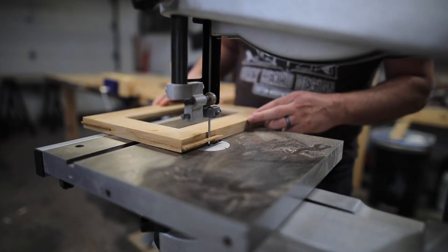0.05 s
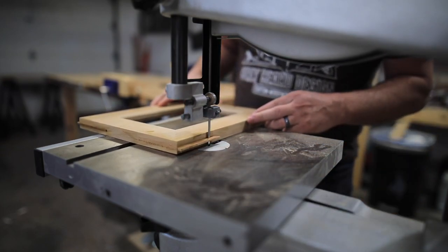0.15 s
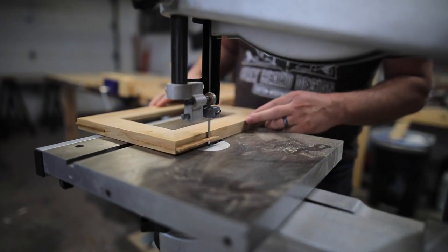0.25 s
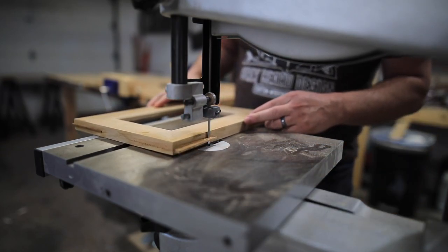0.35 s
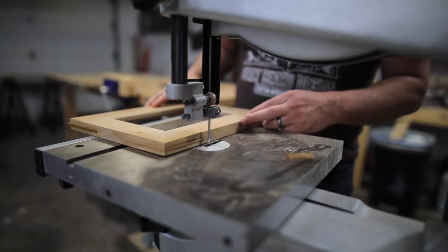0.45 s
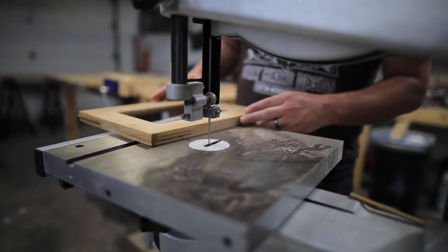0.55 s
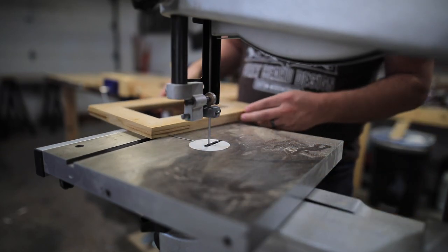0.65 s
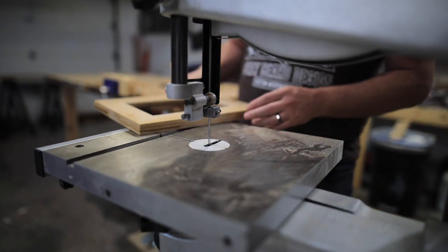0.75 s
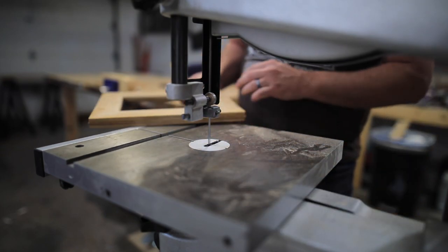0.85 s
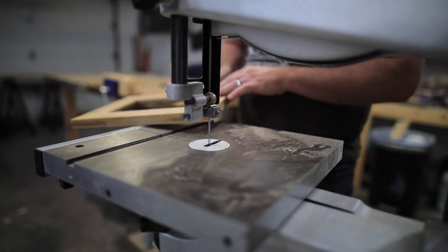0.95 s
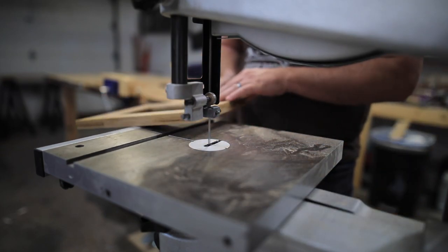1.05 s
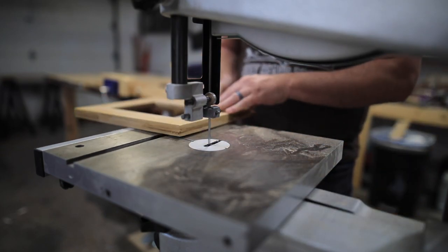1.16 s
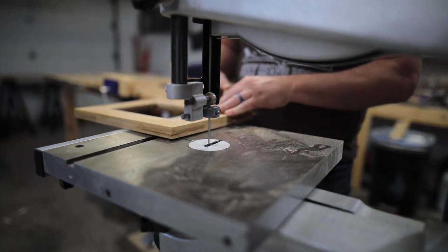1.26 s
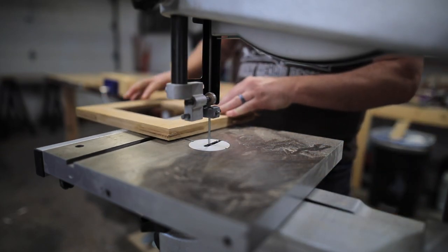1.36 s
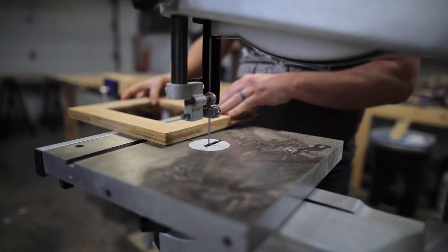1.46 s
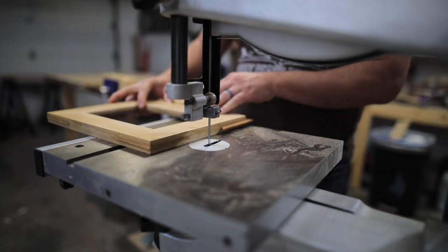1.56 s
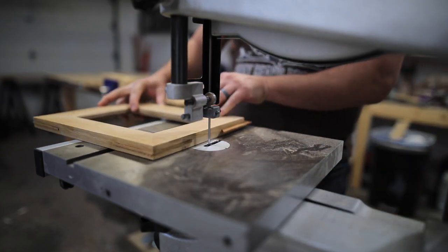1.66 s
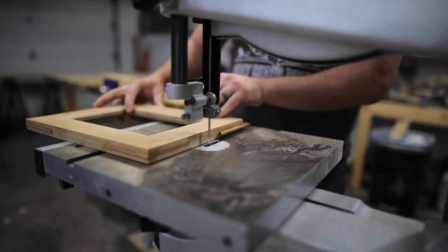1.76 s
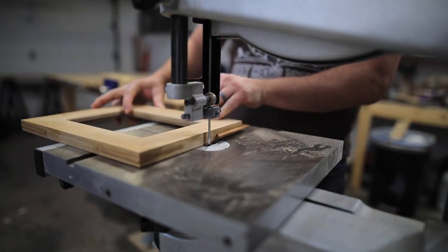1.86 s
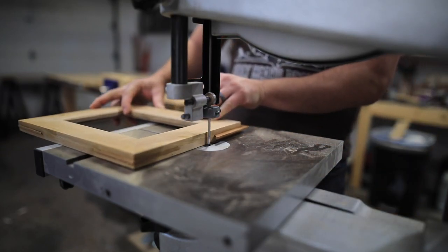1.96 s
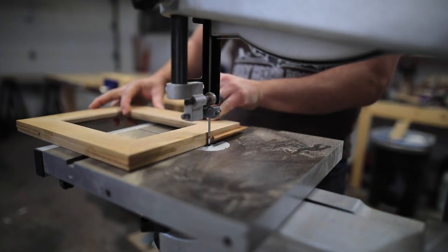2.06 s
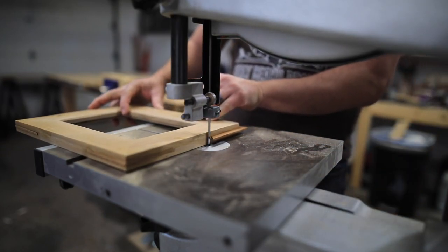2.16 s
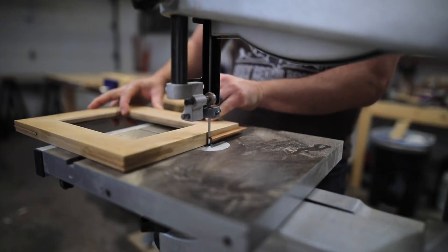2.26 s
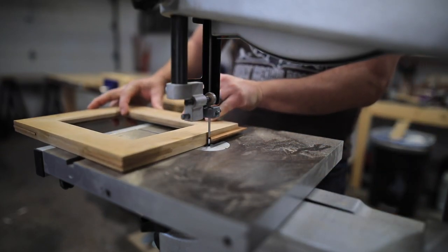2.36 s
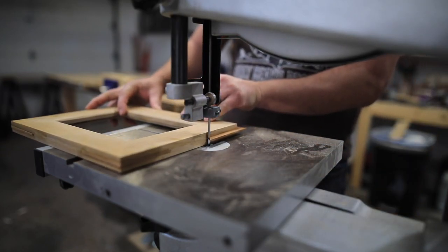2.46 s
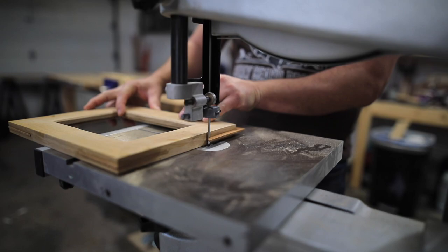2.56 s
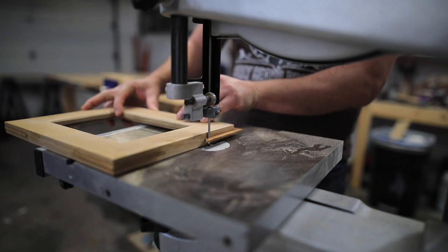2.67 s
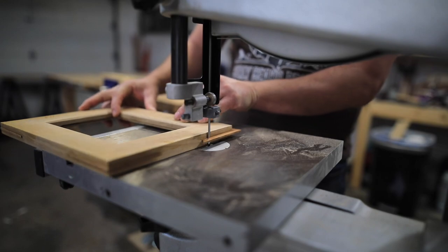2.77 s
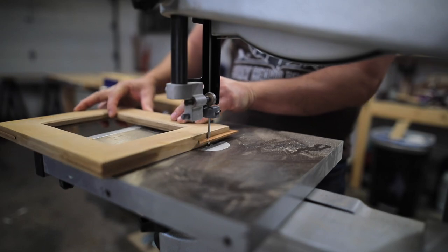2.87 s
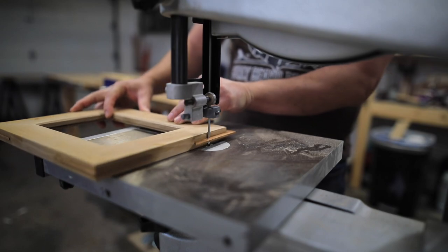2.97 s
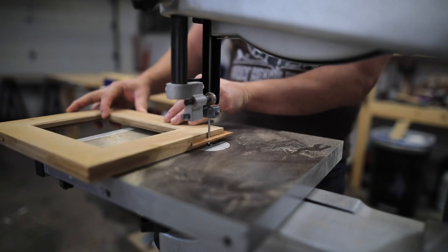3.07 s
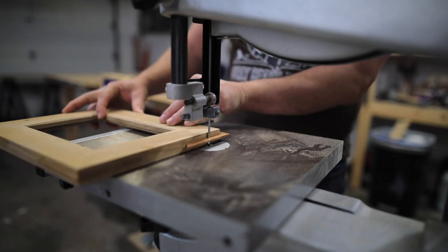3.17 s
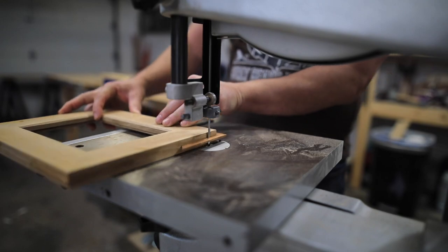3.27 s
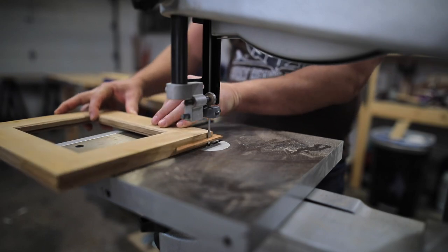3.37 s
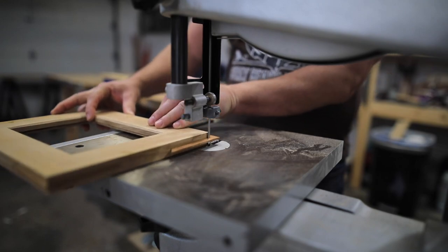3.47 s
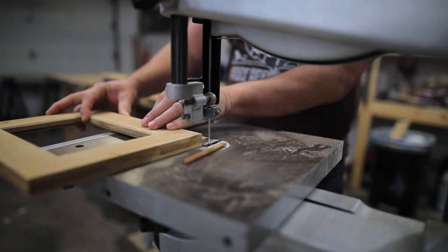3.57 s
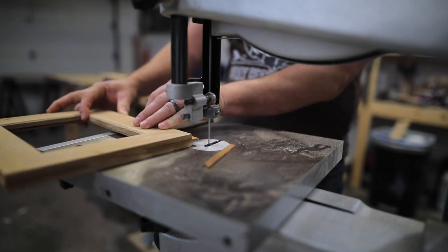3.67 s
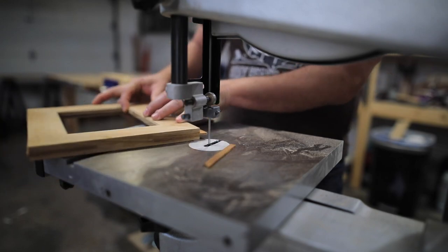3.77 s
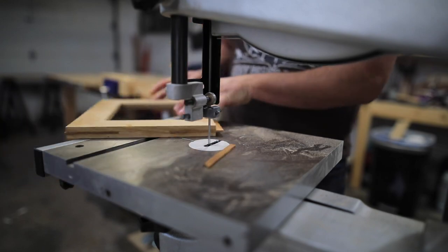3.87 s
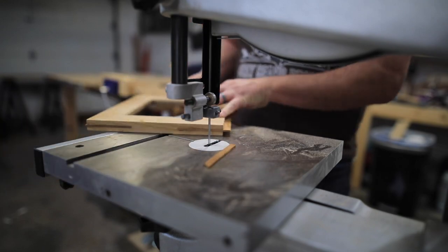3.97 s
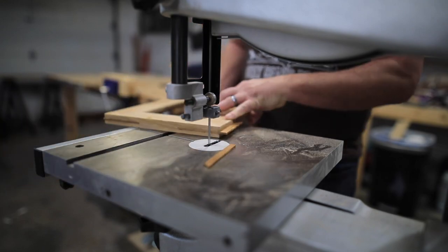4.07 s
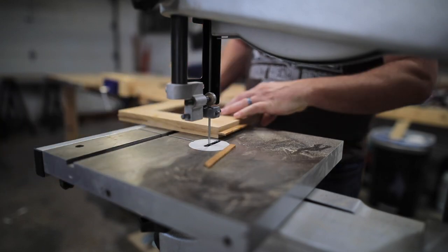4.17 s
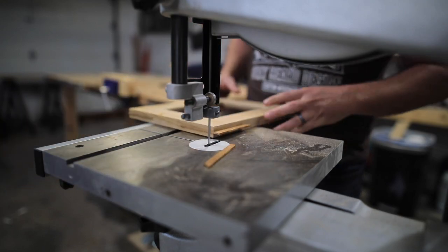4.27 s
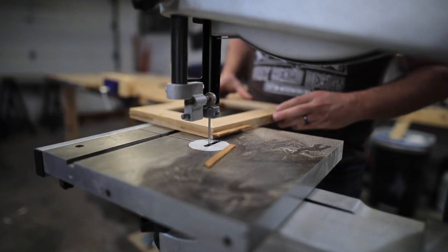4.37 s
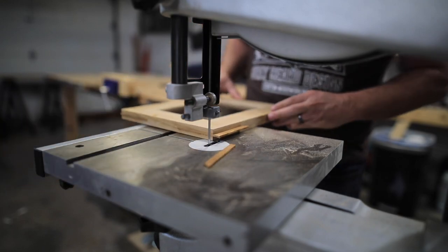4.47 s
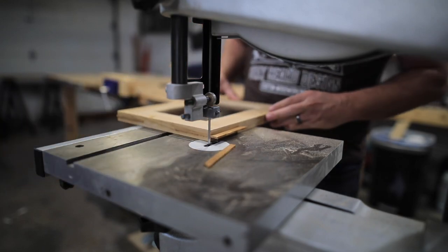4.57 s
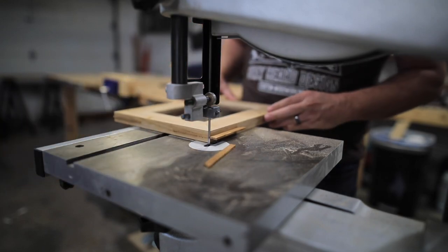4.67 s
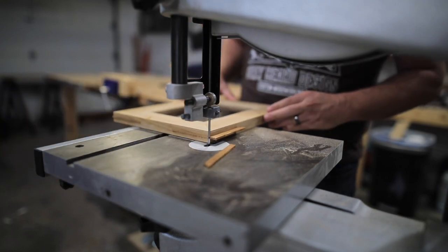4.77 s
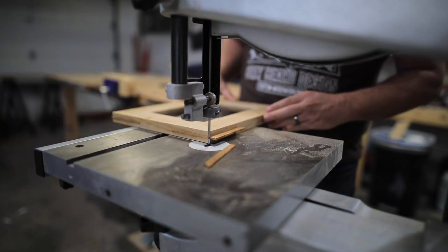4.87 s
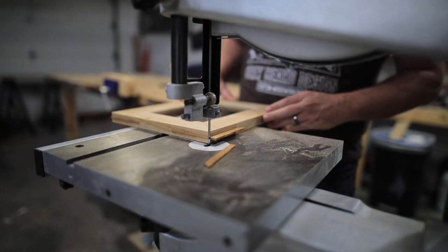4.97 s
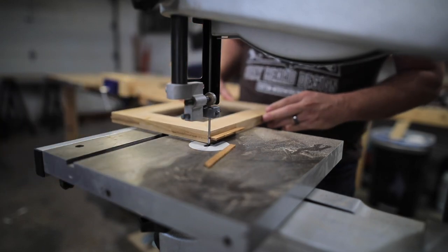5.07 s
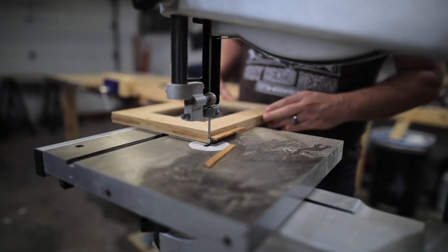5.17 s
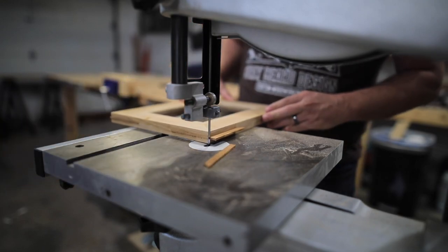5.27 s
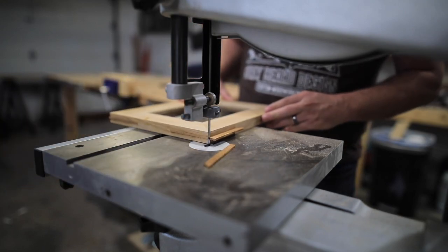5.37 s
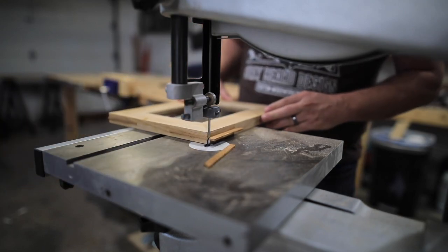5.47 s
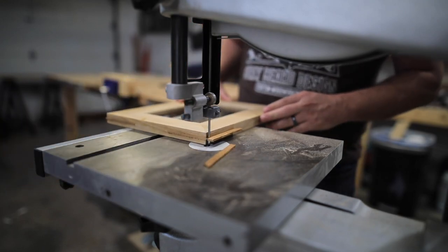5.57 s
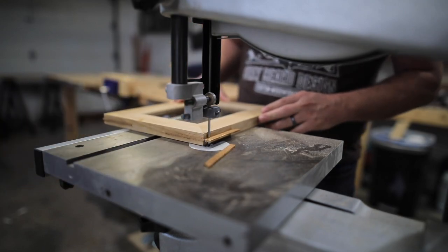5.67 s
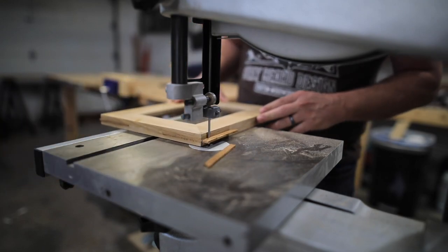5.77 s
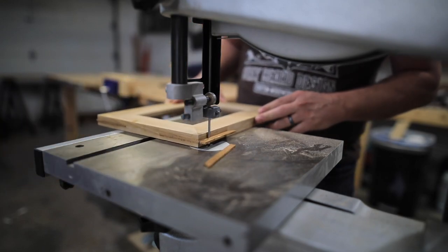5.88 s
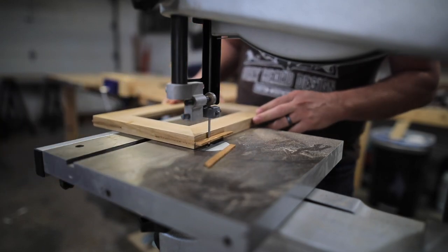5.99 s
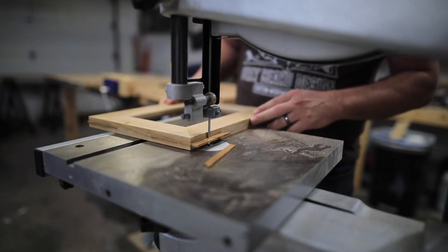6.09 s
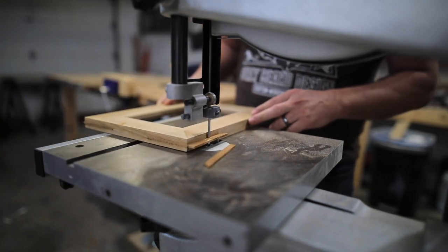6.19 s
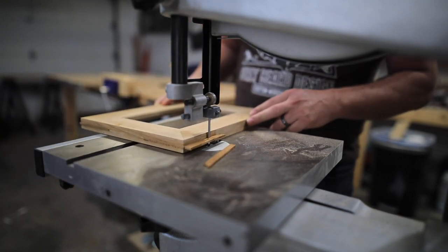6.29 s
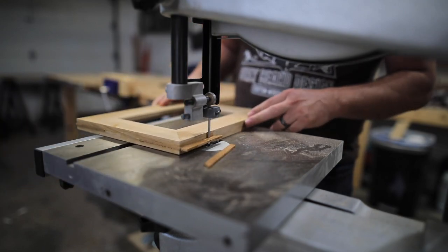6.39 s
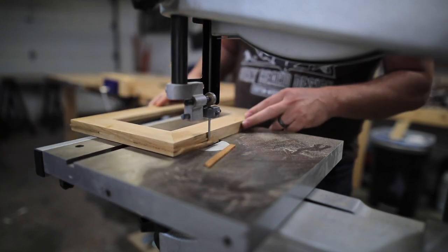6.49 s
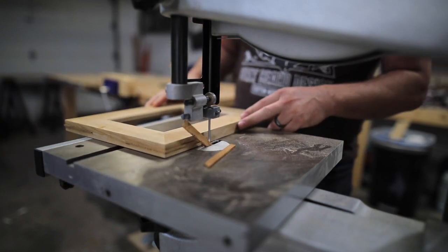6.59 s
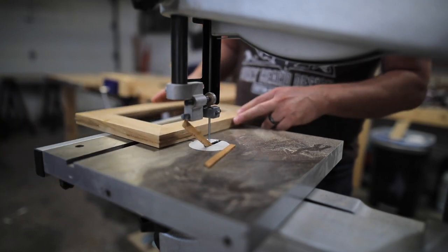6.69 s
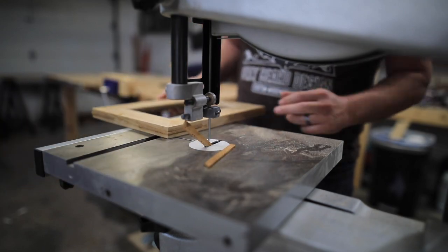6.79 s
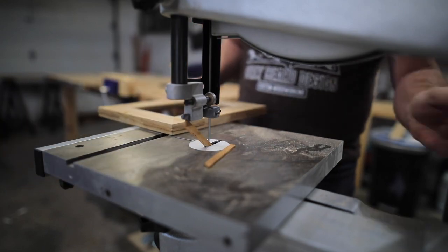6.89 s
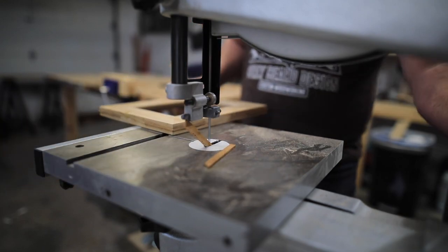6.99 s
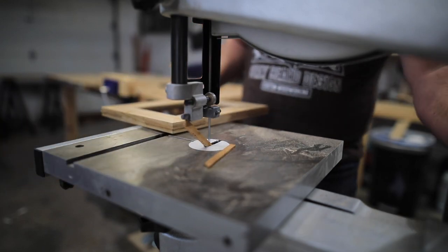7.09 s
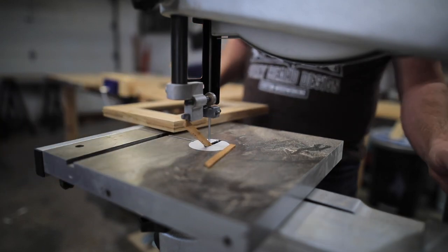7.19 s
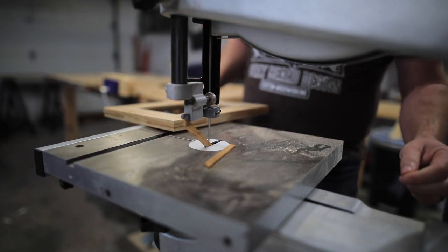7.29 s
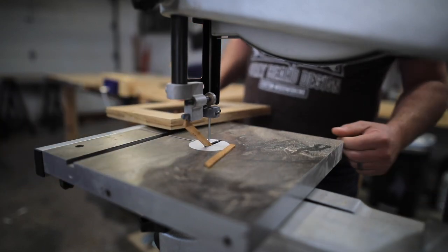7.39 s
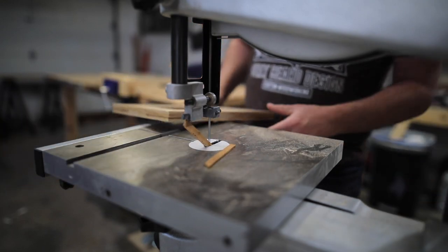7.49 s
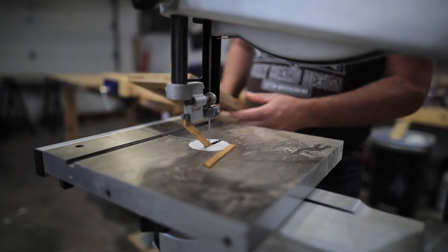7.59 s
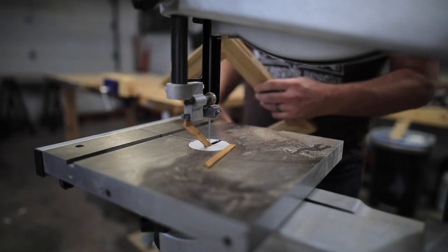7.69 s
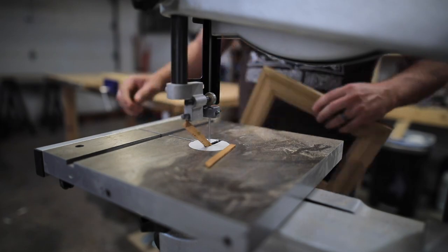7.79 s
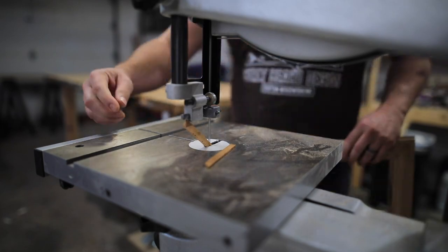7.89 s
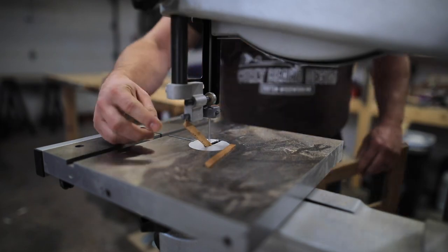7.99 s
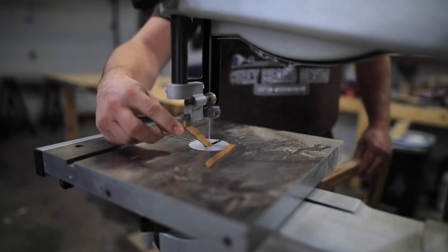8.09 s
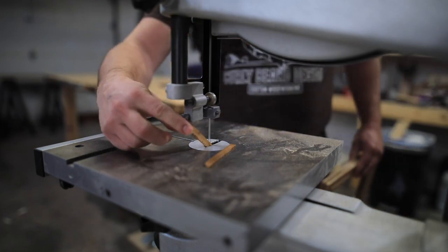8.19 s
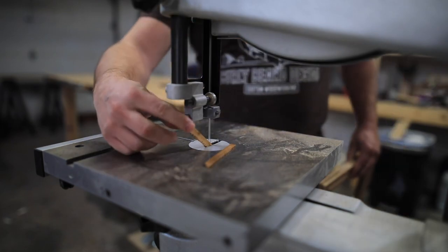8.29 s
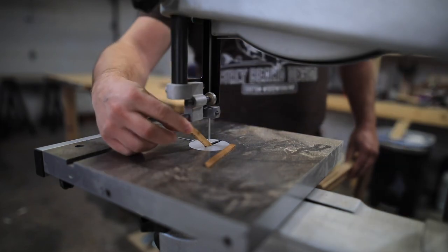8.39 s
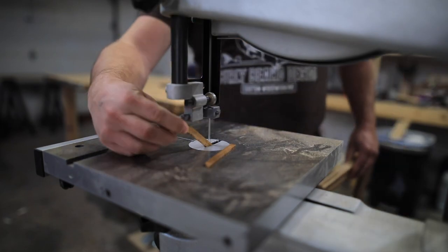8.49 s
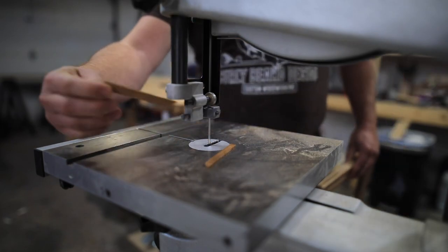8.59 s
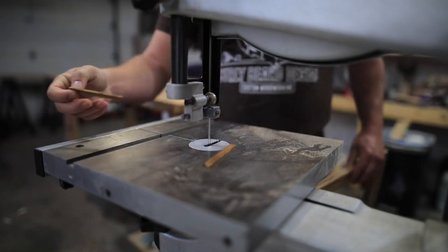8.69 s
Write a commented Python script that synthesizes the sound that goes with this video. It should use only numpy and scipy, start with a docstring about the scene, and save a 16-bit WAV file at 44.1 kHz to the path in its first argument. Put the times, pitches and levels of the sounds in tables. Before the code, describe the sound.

A metallic motor hum and ringing housing run steadily under four bursts of sawing: the tail of one, a long piercing squeal, a brief bite, and another long rough cut. High whistles slide downward in the cuts, and guide hiss swells after them. Wood taps, scuffs and thumps on the table. Finally the hum stops and the whirring blade slows. Heard in mono, near the machine, with little room echo.

```python
"""First heard are the rasp and squeal of a cut already under way: a bandsaw trims a wooden frame in a workshop.
Teeth strike the wood periodically and excite the blade; falling whistles and squeaks are sliding noise bands.
Mains harmonics make the motor hum; filtered noise makes the housing, wheels and guides ring and hiss,
and wavering sines make the blade span sing. The frame taps, scuffs and thumps over a low rumble.
After the last cut the motor is switched off and the blade coasts down."""
import sys
import numpy as np
from scipy import signal
from scipy.fft import rfft, irfft, next_fast_len
from scipy.io import wavfile
from scipy.ndimage import uniform_filter1d, map_coordinates

SR = 44100
rng = np.random.default_rng(int(sys.argv[2]) if len(sys.argv) > 2 else 0)


def wav_record(signal):
    """Record a signal, one row per channel, as 16-bit PCM in the file named by sys.argv[1]."""
    frames = np.transpose(np.atleast_2d(signal))
    bounded = np.clip(frames, -1, 1)
    # unit amplitude maps onto the largest positive 16-bit level
    quanta = np.round(bounded * 32767).astype(np.int16)
    wavfile.write(sys.argv[1], SR, quanta)


N = 385421
TIME = np.arange(N) / SR  # s
MAINS_HZ, TOOTH_HZ = 50, 208.98
SWITCH_OFF = 7.15  # s
COAST_S = 1.57  # s, for an even slowing from full speed to zero
ENTRY_S, EXIT_S, BREAKOUT_S = 0.012, 0.016, 0.07  # teeth bite in, run free, and splinter the last wood
CATCH_DB, CATCH_S = -31.5, 0.02  # the blade chirps as the first teeth catch
DIP_AT, DIP_S, DIP_DB = 3.62, 0.05, -6  # s, s, dB: the machine's ring dips as the offcut comes free

# The cuts: start t/s, end t/s, relative rasp level/dB, rasp trend/(dB/s), break-out swell/dB
CUTS = [(-.4, 0.459, -47, -5, 4.5), (2.404, 3.636, -51.5, 4, 2.5), (4.912, 5.181, -51, 12, 3.5),
        (5.372, 6.604, -45.5, -5, 5.5)]
# Squeal strength through each of the four cuts: t/s, relative level/dB
SQUEAL_LEVELS_1 = [(0.0, -29.5), (0.086, -33), (0.166, -25.5), (0.37, -39), (0.45, -36.5)]
SQUEAL_LEVELS_2 = [(2.41, -40), (2.576, -22.5), (2.954, -24), (2.988, -17.5), (2.994, -25.5),
                   (3.314, -28.5), (3.526, -22.5), (3.578, -43), (3.64, -43.5)]
SQUEAL_LEVELS_3 = [(4.915, -35), (4.989, -52), (5.003, -30), (5.161, -39), (5.17, -49)]
SQUEAL_LEVELS_4 = [(5.38, -33.5), (5.508, -26), (5.916, -38.5), (6.058, -25), (6.33, -24), (6.344, -37),
                   (6.418, -37.5), (6.568, -23.5), (6.6, -41)]


def cut_levels(rasp_follows=0.19):
    """Excitation strength: squeal chirps on entry; rasp drifts, leans with the squeal and swells at break-out."""
    squeal = strokes([(start, CATCH_S, CATCH_DB) for start, *_ in CUTS[1:]])
    rasp = np.zeros(N)
    squeal_tables = [SQUEAL_LEVELS_1, SQUEAL_LEVELS_2, SQUEAL_LEVELS_3, SQUEAL_LEVELS_4]
    for (start, end, db, trend, breakout_db), rows in zip(CUTS, squeal_tables):
        squeal_db, = curves(rows)
        lean = rasp_follows * (squeal_db - np.mean(rows, axis=0)[1])
        edge = breakout_db * np.exp(-((TIME - end) / BREAKOUT_S) ** 2)
        drift = trend * np.clip(TIME - start, 0, end - start)
        gate = engaged(start, end)
        squeal = np.maximum(squeal, gate * amp(squeal_db))
        rasp += gate * amp(db + drift + lean + edge)
    return squeal, rasp


# Squeal harmonics: multiple of the tooth rate, relative level/dB
SQUEAL_HARMONICS = [(37, -14.5), (38, -11), (39, 4.5), (40, -10), (41, -25)]
# Blade resonances that chatter: f/Hz, width/Hz, relative level/dB
BLADE_MODES = [(8360, 17, -25.5), (7860, 168, -10.5), (8125, 69, -2.5), (8430, 67, -14.5)]
# Rasp spectrum: f/Hz, relative level/dB
RASP_SPECTRUM = [(500, -6), (1100, -10), (1600, 5.5), (2100, -2), (3000, -4.5), (4400, -7), (5400, 5.5),
                 (6400, 1.5), (9500, 5.5), (11200, -15.5), (12200, 6), (13200, -7.5), (15700, 0)]
# Resonances heard in the rasp at the kerf: f/Hz, width/Hz, relative level/dB
KERF_MODES = [(2340, 44, -14.5), (2760, 8.2, -4.5), (3116, 35, -7.5), (4076, 69, -6), (4286, 12, -2),
              (5320, 8.4, 2.5), (7010, 66, 2), (9040, 130, -14.5), (10400, 160, -8.5), (12350, 73, -8.5)]


def cutting(tone_gain, rasp_gain, squeal_db=-1.5, chatter_db=-9, rasp_db=5, kerf_db=2,
            shaft_swing=0.58, shaft_beat=0.18, bite=0.27, rough_db=1.5):
    """Periodic excitation: tooth strikes favour the harmonics near blade resonance and modulate noise into rasp."""
    shaft = np.pi * MAINS_HZ * TIME  # a four-pole motor turns at half the mains rate
    tooth = turning(TOOTH_HZ * (1 + 0.00019 * wobble(14)))
    sway = shaft_swing * np.sin(shaft) + 0.2 * wobble(83)  # the drive makes the blade speed ripple
    # every tooth restarts the ring, so the harmonics keep in step and the squeal buzzes
    tone = sum(amp(db + 0.29 * wobble(40)) * np.cos(order * (tooth - 1) + sway)
               for order, db in SQUEAL_HARMONICS)
    tone = unit(tone * (1 + shaft_beat * np.cos(shaft)) * amp(rough_db * wobble(60)))
    chips = amp(wobble(200))  # irregular chip size
    bites = np.exp(bite * np.cos(tooth)) * chips
    chatter = resonant(white() * bites, BLADE_MODES)
    squeal = amp(squeal_db) * tone + amp(chatter_db) * chatter
    tearing = ringing(coloured(white() * bites, RASP_SPECTRUM), t60=0.081, wet_db=1)
    kerf = resonant(white() * bites, KERF_MODES)
    rasp = amp(rasp_db) * patchy(tearing, depth_db=4.0) + amp(kerf_db) * kerf
    return tone_gain * squeal + rasp_gain * rasp


def squeaks(rasp_gain, per_second=60, low_hz=9300, high_hz=15600, length=0.029, fall=0.029, level_db=-3):
    """Stick-slip: wood fibres catch on the teeth in brief falling squeaks that follow the rasp level."""
    out = np.zeros(N)
    for start, end, *_ in CUTS:
        for when, pitch, size in rng.random((int((end - start) * per_second), 3)):
            s = start + when * (end - start - length)
            hz = low_hz + pitch * (high_hz - low_hz)
            squeak = band(length, hz, hz * (1 - fall), width_hz=740, ragged_db=5.5)
            add(out, s, amp(level_db + 10 * (size - 0.5)) * squeak)
    return rasp_gain * out


# Whistles that fall as the slot lengthens: t/s, length/s, from f/Hz, to f/Hz, relative level/dB
WHISTLES = [(2.553, .085, 14300, 10000, -34.5), (2.808, 0.15, 14700, 9400, -40),
            (3.049, .15, 16100, 11600, -31), (3.25, .12, 14700, 13100, -38),
            (3.529, 0.13, 12600, 12350, -25), (3.509, 0.15, 6200, 4150, -36),
            (3.564, 0.1, 11500, 9400, -38), (5.032, 0.11, 12200, 9900, -40),
            (5.424, 0.051, 11300, 8800, -34), (5.508, .25, 7900, 4700, -45),
            (6.014, .11, 15800, 13800, -39), (6.19, .13, 14700, 14250, -44)]
# Steady rings of wood and blade: t/s, length/s, f/Hz, relative level/dB
WOOD_RINGS = [(2.999, 0.42, 2330, -49.5), (3.15, 0.31, 2830, -51.5), (3.256, .32, 7040, -37.5),
              (3.59, 0.064, 4200, -36.5), (5.091, 0.13, 4070, -49), (5.398, 0.35, 7030, -37.5),
              (5.549, 0.54, 2800, -50.5), (6.082, .26, 4070, -47.5), (6.5, 0.15, 4080, -48)]


def whistles(width_share=0.045, smear=0.07, slide_db=-2, ring_hz=100, ring_db=0):
    """Resonance shift: ragged bands fall as the blade goes deeper, wider when high or far-sliding; others hold."""
    out = np.zeros(N)
    for s, length, from_hz, to_hz, db in WHISTLES:
        width = width_share * from_hz + smear * abs(from_hz - to_hz)
        add(out, s, amp(db + slide_db) * band(length, from_hz, to_hz, width, ragged_db=2.5))
    for s, length, hz, db in WOOD_RINGS:
        add(out, s, amp(db + ring_db) * band(length, hz, hz, ring_hz, ragged_db=0.0))
    return out


# Housing noise spectrum: f/Hz, relative level/dB
HOUSING_SPECTRUM = [(250, -17.5), (480, -19.5), (560, -10), (760, -3), (1000, -2.5), (1300, -6),
                    (1600, -6.5), (1980, -0.5), (2100, -13.5), (2800, -13), (4000, -15)]
# Housing resonances: f/Hz, width/Hz, relative level/dB
HOUSING_MODES = [(576.4, 5.5, -3), (667, 8, -15.5), (758.3, 10, 3.5), (780, 11, -2), (795, 7.4, 1),
                 (846, 5.8, -7.5), (939, 4.2, 2), (1420, 14, -6), (1472, 11, -2.5), (1826, 11, -4),
                 (1897, 29, -10.5), (2005, 5.9, -1.5), (602.4, 9, 0.5)]


def housing(idle_db=-52.3, load_db=3, lag_s=0.89, unpowered_db=-3.0, speed_power=0.71,
            panels_db=2.0, modes_db=-2):
    """Forced vibration: motor and blade shake the housing, more after a load, less without power or speed."""
    noise = ringing(coloured(white(), HOUSING_SPECTRUM), t60=0.22, wet_db=-6)
    panels = amp(panels_db + 1.5 * wobble(30)) * noise
    modes = amp(modes_db) * resonant(white(), HOUSING_MODES)
    off = np.clip((TIME - SWITCH_OFF) / 0.15, 0, 1)
    level = amp(idle_db + load_db * load(lag_s) + unpowered_db * off)
    return level * speed() ** speed_power * (panels + modes)


# Wheel resonances with the blade running free: f/Hz, width/Hz, relative level/dB
WHEEL_FREE = [(1066, 11, 0), (1098.3, 17.6, 2), (1117, 11, 1), (1174, 75, -12), (1220, 10, -0.5)]
# Wheel resonances with the blade strained: f/Hz, width/Hz, relative level/dB
WHEEL_LOADED = [(1130, 19, -19.5), (1141, 14, 10), (1180, 31, 3.5), (1204, 8.7, 12.5)]


def wheels(free_db=-48.5, loaded_db=-46.0, stirred_db=4, stirred_s=0.55, lag_s=0.078, late_strain=0.56,
           speed_power=0.48, stall_s=8.37, stall_t60=0.33, throb_db=0.43, loop_hz=3.8):
    """Modal exchange: strain in the cuts, and partly after the last, brings other modes, with a steady throb."""
    late = late_strain * np.clip((TIME - CUTS[-1][1]) / lag_s, 0, 1)
    strain = np.clip(load(lag_s) + late, 0, 1)
    free_level = amp(free_db + stirred_db * load(stirred_s))
    free = free_level * np.sqrt(1 - strain) * resonant(white(), WHEEL_FREE)
    loaded = amp(loaded_db) * np.sqrt(strain) * resonant(white(), WHEEL_LOADED)
    stall = np.maximum(-60 * np.maximum(TIME - stall_s, 0) / stall_t60, -15)  # at most 15 dB down
    throb = throb_db * np.sin(2 * np.pi * loop_hz * TIME)
    return amp(throb + stall) * speed() ** speed_power * (free + loaded)


# Modes of the free blade span: f/Hz at full speed, width/Hz, relative level/dB
SPAN_MODES = [(904.5, 4.6, -3), (1768, 7.45, -2.5), (1804, 7.7, 2.5)]
# Swells of the singing span: t/s, length/s, relative level/dB
SPAN_SWELLS = [(.17, 0.22, -41), (.28, 0.65, -45), (.49, .22, -41), (3.22, 0.41, -48), (3.72, .17, -37.5),
               (4.02, 0.13, -49.5), (4.26, 0.12, -46.5), (4.49, 0.13, -46.5), (4.72, .16, -48),
               (4.95, 0.71, -44.5)]


def span(base_db=-56, speed_power=0.81, sag=0.1):
    """Self-sustained vibration: the free span sings softly with louder swells; its pitch sags as it coasts."""
    pace = speed()
    level = amp(base_db) * pace ** speed_power + strokes(SPAN_SWELLS)
    return level * singing(SPAN_MODES, 1 - sag * (1 - pace) ** 2, waver_db=0.5)


def machine(shaken_db=2.5, full_swell_db=-45):
    """Coupled vibration: housing and wheels swell with the span; all dip together as the offcut comes free."""
    shaken = amp(shaken_db * np.tanh(strokes(SPAN_SWELLS) / amp(full_swell_db)))
    dip = amp(DIP_DB * np.exp(-((TIME - DIP_AT) / DIP_S) ** 2))
    return dip * (shaken * (housing() + wheels()) + span())


# Sliding hiss spectrum: f/Hz, relative level/dB
GUIDE_HISS = [(1500, -36), (2400, -0.5), (3900, 0), (4800, -1.5), (6500, -0.5), (7300, 0), (8200, 1.5),
              (9300, 6), (10100, -2.5), (12000, -1.5), (13300, -6.5), (14000, -16.5), (15700, -17.5)]
# Guide resonances: f/Hz, width/Hz, relative level/dB
GUIDE_MODES = [(2520, 41, -5.5), (3237, 30, -1.5), (3910, 25, -0.5), (6130, 13, 6.5), (6700, 140, -11.5),
               (9260, 74, -7), (9330, 50, -4.5), (10680, 60, -4.5), (11900, 200, -8.5), (12620, 58, -9.5),
               (14080, 46, -11)]


def guides(clean_db=-52, dusty_db=9, clear_s=1.77, speed_power=1.5, hiss_db=-3, ring_db=-4.5,
           flutter_db=1.5, dust_db=-11):
    """Sliding friction: steel hisses and rings, louder while sawdust clings, which fizzes after the last cut."""
    sliding = ringing(coloured(white(), GUIDE_HISS), t60=0.11, wet_db=0.5)
    hiss = amp(hiss_db + 1.8 * wobble(120)) * sliding
    ring = amp(ring_db) * resonant(white() * amp(flutter_db * wobble(18)), GUIDE_MODES)
    fizz = coloured(white() * amp(4.3 * wobble(400)),
                    [(8000, -19), (12600, -6.0), (14800, -1), (15700, -10.5)])  # f/Hz, relative level/dB
    dust = amp(dust_db) * (TIME > CUTS[-1][1]) * fizz
    level = amp(clean_db + dusty_db * load(clear_s)) * speed() ** speed_power
    return level * (hiss + ring + dust)


# Thin whine of the guides: f/Hz, width/Hz, relative level/dB
GUIDE_TONES = [(5510, 14, 3.5), (5720, 21, 5)]
# The blade brushes a guide harder: t/s, length/s, relative level/dB
WHINE_FLARES = [(3.92, .12, -43), (4.16, .12, -53)]


def whine(whine_db=-53, speed_power=1.7, drift_db=1):
    """Frictional resonance: the guides whine roughly, flaring when the blade brushes them harder."""
    level = amp(whine_db + drift_db * wobble(6)) * speed() ** speed_power
    tone = resonant(white() * amp(1.6 * wobble(16)), GUIDE_TONES)
    return (level + strokes(WHINE_FLARES)) * tone


# Motor hum: multiple of the mains frequency, relative level/dB
HUM_ORDERS = [(6, -13), (12, 0.5), (18, -8.5), (24, -11)]


def motor(idle_db=-51, load_db=7.5, lag_s=0.19, stop_t60=0.06):
    """Magnetic forcing: hum on multiples of the mains grows under load and dies with the switch."""
    phase = turning(MAINS_HZ * (1 + 0.00099 * wobble(5.95)))
    tone = sum(amp(db + 0.73 * wobble(13)) * np.sin(order * phase + rng.uniform(0, 2 * np.pi))
               for order, db in HUM_ORDERS)
    decay_db = -60 * np.maximum(TIME - SWITCH_OFF, 0) / stop_t60
    return unit(tone) * amp(idle_db + load_db * load(lag_s) + decay_db)


# The frame is set down on the steel table: t/s, relative level/dB
TAPS = [(1.2162, -26.5), (1.2221, -36.5)]
# Modes of the tapped frame: f/Hz, mean relative level/dB, t60/s
FRAME_MODES = [(1890, -14, 0.091), (2420, 3.5, 0.035), (3120, -19, .08), (3610, 5, 0.082), (4339, 4, 0.073),
               (4570, 1.5, 0.094), (5080, 1, .11), (6153, -26, .06), (7200, 2, 0.031), (8030, 3.5, 0.039)]
# The frame scuffs across the table: t/s, length/s, level/dB
SCUFFS = [(2.5, 0.076, -52.5), (4.1, 0.15, -48.5), (5.425, 0.063, -45), (7.522, 0.046, -37.5),
          (7.5, 0.13, -38.5)]
# Scuff resonances: f/Hz, width/Hz, relative level/dB
SCUFF_MODES = [(1666, 120, -5), (1885, 62, 5), (1980, 84, 1), (3530, 180, -19.5), (4080, 340, -19),
               (4400, 120, -27)]
# Light brushes on the table as the saw slows: t/s, length/s, level/dB
BRUSHES = [(8.16, 0.053, -57), (8.21, 0.056, -54), (8.31, .05, -57.5), (8.605, 0.024, -67)]


def frame(ring_db=-10, crack_db=-5, crack_t60=0.083):
    """Impact and friction: wood on the steel table gives a bright tap, squeaky scuffs and light brushes."""
    ring, crack = np.zeros(N), np.zeros(N)
    t = np.arange(SR // 3) / SR
    for s, db in TAPS:
        modes = sum(amp(level + rng.normal(0, 2) - 60 * t / t60)
                    * np.sin(2 * np.pi * hz * t + rng.uniform(0, 2 * np.pi))
                    for hz, level, t60 in FRAME_MODES)
        add(ring, s, amp(db + ring_db) * modes)
        add(crack, s, amp(db + crack_db - 60 * t / crack_t60))
    # spectra: f/Hz, relative level/dB
    crackle = coloured(white(), [(900, -3.5), (2300, -1), (8300, -0.5), (10000, -29.0), (15000, -34)])
    tap = ring + crack * crackle
    scuff = strokes(SCUFFS) * resonant(white() * amp(1.3 * wobble(150)), SCUFF_MODES)
    brush = strokes(BRUSHES) * coloured(
        white() * amp(2.7 * wobble(300)),
        [(1500, -6.5), (3000, 1.0), (6000, -5), (12000, -2.5), (15500, -11)])
    return tap + scuff + brush


# Louder dull thumps of the work being handled: t/s, relative level/dB
THUMPS = [(.1, -38.5), (.27, -40), (.297, -35), (.328, -40), (.427, -38.5), (.564, -41.5), (.873, -39.5),
          (1.29, -39), (1.706, -40.5), (2.419, -50), (2.623, -43), (2.679, -42), (2.83, -43),
          (3.048, -36.5), (3.215, -38.5), (3.815, -50), (3.953, -39.5), (4.081, -45), (4.186, -48),
          (4.564, -47.5), (5.432, -48), (5.682, -31.5), (5.924, -43), (6.054, -33), (6.454, -42),
          (6.589, -41), (6.632, -36.5), (6.861, -42.5), (6.946, -43), (7.118, -41.5), (7.303, -40.5),
          (7.51, -36), (7.608, -39), (7.706, -34), (7.744, -40.5), (7.886, -42.5), (8.096, -47),
          (8.179, -41), (8.599, -42)]
# Shudder and rumble spectrum: f/Hz, relative level/dB
RUMBLE = [(20, -36), (45, -14), (80, -2), (140, 0.5), (240, -5), (350, -8.5), (600, -28)]


def thumps(push_hz=160, push_db=-3, shudder_db=-11, shudder_t60=0.19, lead=0.014, floor_db=-72.0,
           soft_db=-51, soft_spread_db=0.0, count=16):
    """Impulse response: a low push and a short shudder; softer random ones too, over a fluctuating rumble."""
    out, shudder = np.zeros(N), np.zeros(N)
    t = np.arange(-SR // 20, SR // 4) / SR
    soft = [((k + when) / count * TIME[-1], soft_db + soft_spread_db * (2 * size - 1))
            for k, (when, size) in enumerate(rng.random((count, 2)))]
    variations = rng.standard_normal((len(THUMPS) + count, 2))
    for (s, db), (pitch, phase) in zip(THUMPS + soft, variations):
        cycles = push_hz * np.exp(0.2 * pitch) * t
        push = np.exp(-(cycles / 0.69) ** 2) * np.cos(2 * np.pi * cycles + phase)
        add(out, s + t[0], -amp(db + push_db) * push)
        decay = amp(db + shudder_db - 60 * np.maximum(t, 0) / shudder_t60)
        add(shudder, s + t[0], decay * np.exp(np.minimum(t, 0) / lead))
    floor = amp(floor_db + 8.0 * np.tanh(wobble(14)))
    return out + (shudder + floor) * coloured(white(), RUMBLE)


# Room air spectrum: f/Hz, relative level/dB
SHOP = [(100, 6), (1000, -12), (2500, -2), (4000, -5), (5000, -16.5), (9000, -28), (15000, -40)]


def workshop(air_db=-65):
    """Stationary noise: the quiet air of the room."""
    return amp(air_db) * coloured(white(), SHOP)


def engaged(start, end):
    """Contact gating, 0 to 1: how far the teeth are in the wood during one cut."""
    entering = np.clip((TIME - start) / ENTRY_S + 0.5, 0, 1)
    return entering * np.clip((end - TIME) / EXIT_S + 0.5, 0, 1)


def load(lag_s):
    """First-order lag, 0 to 1: delayed response to the cuts, the first already under way."""
    teeth = sum(engaged(start, end) for start, end, *_ in CUTS)
    keep = np.exp(-1 / (lag_s * SR))
    built_up = 1 - np.exp(CUTS[0][0] / lag_s)
    return signal.lfilter([1 - keep], [1, -keep], teeth, zi=[built_up])[0]


def speed(crawl=0.079):
    """Constant deceleration: blade speed as a share of full speed, falling by friction to a crawl."""
    return np.clip(1 - (TIME - SWITCH_OFF) / COAST_S, crawl, 1)


def singing(modes, sag, waver_db):
    """Self-sustained modes: friction keeps them sounding while pitch and strength waver; rms 1."""
    return unit(sum(amp(db + waver_db * wobble(13)) * np.sin(turning(hz * sag + width * 0.5 * wobble(50)))
                    for hz, width, db in modes))


def band(length, from_hz, to_hz, width_hz, ragged_db):
    """Quadrature modulation: one swell of narrow noise whose centre slides."""
    count = max(int(length * SR), 8)
    phase = turning(np.geomspace(from_hz, to_hz, count))
    knot = [np.arange(count) / SR * width_hz]
    a, b, flutter = (map_coordinates(k, knot, order=1, mode="wrap") for k in rng.standard_normal((3, 300)))
    swell = amp(ragged_db * flutter) * np.sqrt(np.hanning(count))
    return swell * (a * np.cos(phase) + b * np.sin(phase))


def patchy(x, depth_db):
    """Time-varying filtering: colour shifts from moment to moment as the teeth meet changing grain."""
    z = signal.stft(x, nperseg=512)[2]
    field = uniform_filter1d(rng.standard_normal(z.shape), size=5, axis=0)  # smooth over frequency
    field = uniform_filter1d(field, size=7, axis=1)  # then over time
    return unit(signal.istft(z * amp(depth_db * unit(field)), nperseg=512)[1][:N])


def ringing(x, t60, wet_db):
    """Dense modal decay: countless small steel modes ring on briefly behind a sound."""
    t = np.arange(SR // 6) / SR
    tail = rng.standard_normal(len(t)) * amp(-60 * t / t60)
    wet = signal.fftconvolve(x, tail / np.linalg.norm(tail))[:N]
    return (x + amp(wet_db) * wet) / np.hypot(1, amp(wet_db))


def resonant(x, modes):
    """Modal superposition: x through (f/Hz, width/Hz, level/dB) resonances of alternating sign, at rms 1."""
    def response(f):
        return sum((-1) ** k * amp(db) * 1j * f * w / (c * c - f * f + 1j * f * w)
                   for k, (c, w, db) in enumerate(modes))
    return unit(filtered(x, response))


def coloured(x, points):
    """Spectral shaping: x through a curve of (f/Hz, level/dB) points with outer skirts, at rms 1."""
    f, db = np.transpose(points)

    def response(hz):
        above = 1 + (hz / (2 * f[-1])) ** 8
        below = 1 + (f[0] / (2 * hz + 1)) ** 8
        return amp(np.interp(np.log(hz + 1), np.log(f), db)) / np.sqrt(above * below)
    return unit(filtered(x, response))


def filtered(x, response):
    """Linear filtering: multiply the spectrum of x by a response of frequency."""
    size = next_fast_len(N + SR // 4, True)
    return irfft(rfft(x, size) * response(np.fft.rfftfreq(size, 1 / SR)), size)[:N]


def white():
    """Equal power at all frequencies: fresh white noise."""
    return rng.standard_normal(N)


def wobble(rate):
    """Random modulation: a smooth curve with rate knots a second."""
    knots = rng.standard_normal(int(N * rate / SR) + 4)
    coarse = TIME[::16]
    return np.interp(TIME, coarse, map_coordinates(knots, [coarse * rate]))


def turning(hz):
    """Phase integration: phase in radians of something that turns at a changing rate."""
    return 2 * np.pi * np.cumsum(hz) / SR


def strokes(rows):
    """Amplitude envelope: one smooth swell for each (t/s, length/s, level/dB) row."""
    gain = np.zeros(N)
    for s, length, db in rows:
        add(gain, s, amp(db) * np.sqrt(np.hanning(max(int(length * SR), 8))))
    return gain


def curves(rows):
    """Linear interpolation: one value per sample for each column after the time."""
    s, *cols = np.transpose(rows)
    return [np.interp(TIME, s, c) for c in cols]


def add(track, s, sound):
    """Superposition: mix a sound into the track at time s."""
    part = track[max(round(s * SR), 0):][:len(sound)]
    part += sound[:len(part)]


def amp(db):
    """Logarithmic level: decibels to gain."""
    return 10 ** (np.asarray(db) / 20)


def unit(x):
    """Power normalisation: scale to rms 1."""
    return x / np.sqrt(np.mean(x ** 2) + 1e-20)


def scene():
    """Superposition: all sources at one microphone."""
    squeal_gain, rasp_gain = cut_levels()
    cuts = cutting(squeal_gain, rasp_gain) + squeaks(rasp_gain) + whistles()
    saw = machine() + guides() + whine() + motor()
    return (cuts + saw + frame() + thumps() + workshop())[None]


def record(dry):
    """Band limiting: nothing above the upper frequency limit is kept."""
    top_hz = 15780
    return filtered(dry[0], lambda hz: hz < top_hz)[None]


dry = scene()
out = record(dry)
wav_record(out)
```